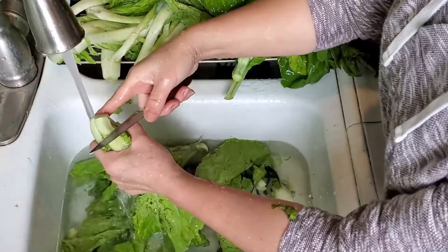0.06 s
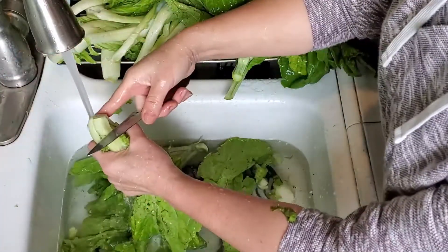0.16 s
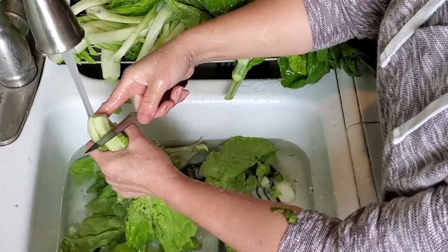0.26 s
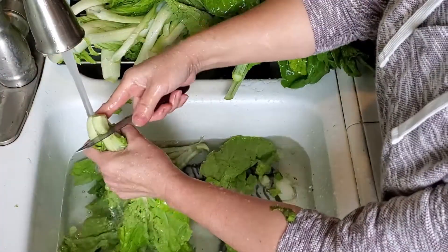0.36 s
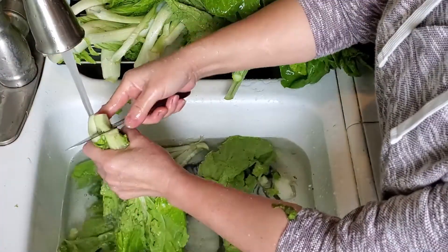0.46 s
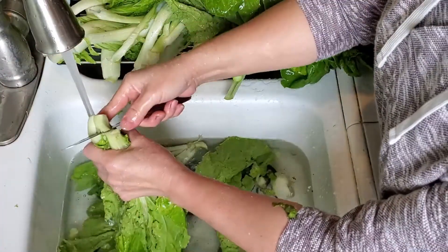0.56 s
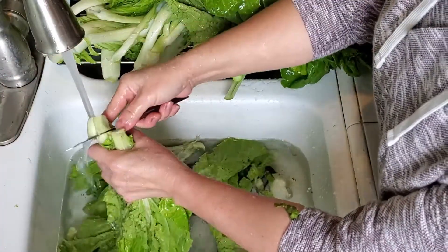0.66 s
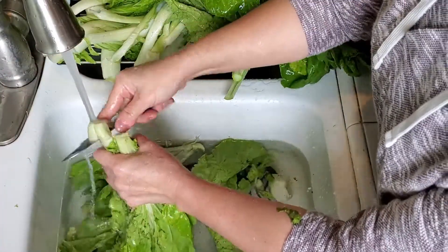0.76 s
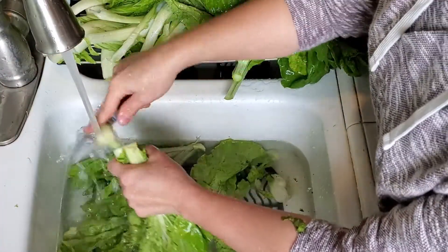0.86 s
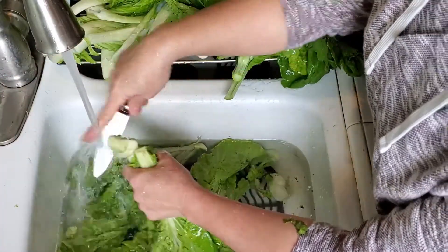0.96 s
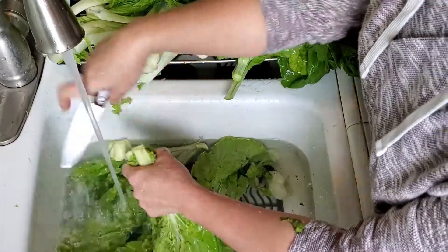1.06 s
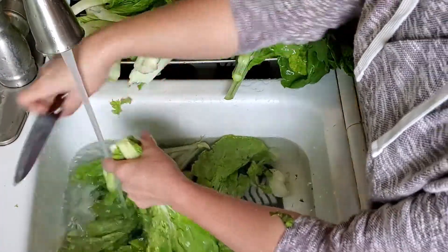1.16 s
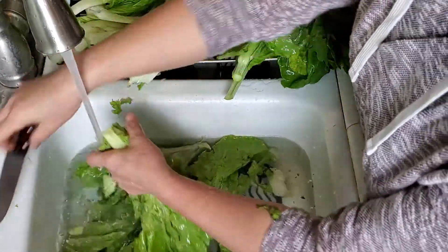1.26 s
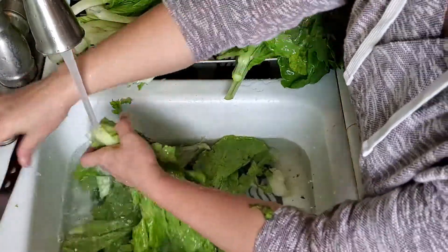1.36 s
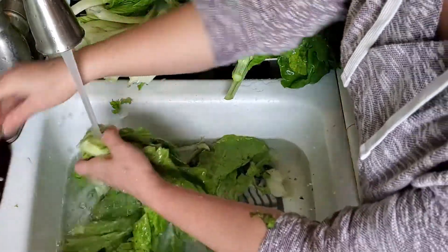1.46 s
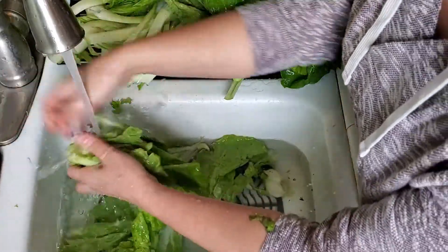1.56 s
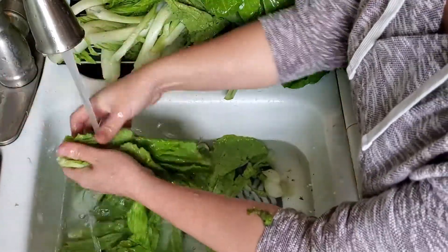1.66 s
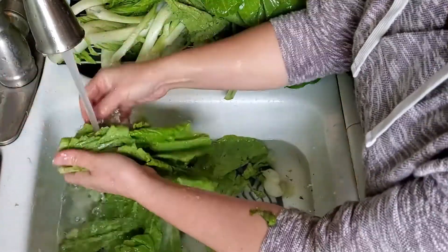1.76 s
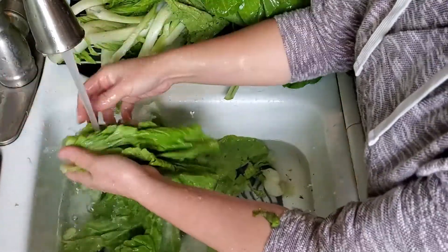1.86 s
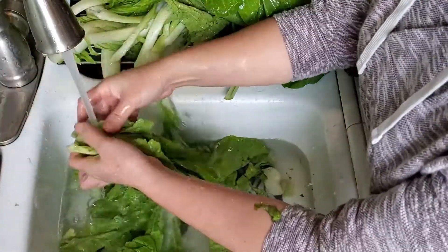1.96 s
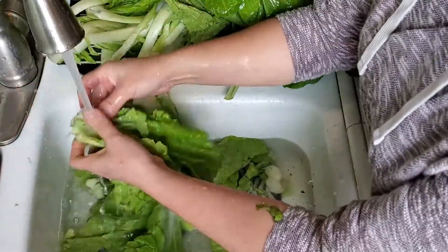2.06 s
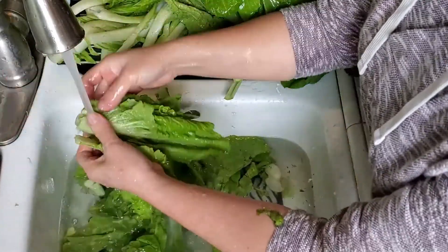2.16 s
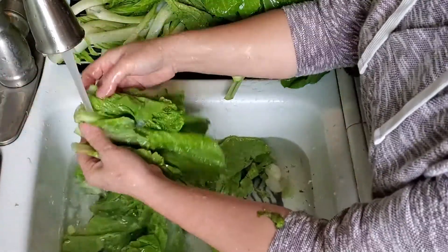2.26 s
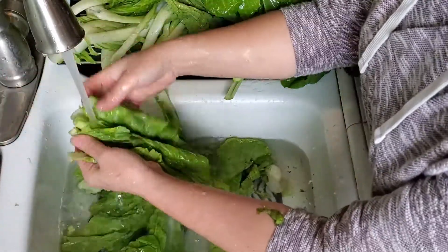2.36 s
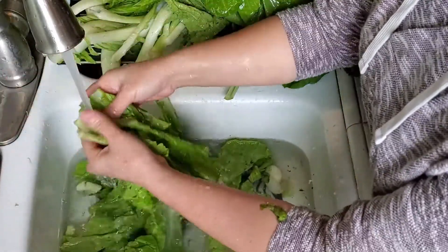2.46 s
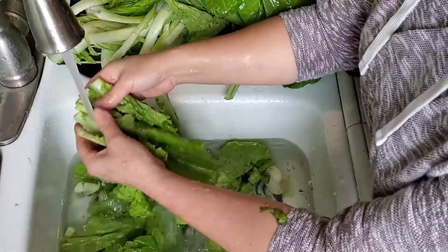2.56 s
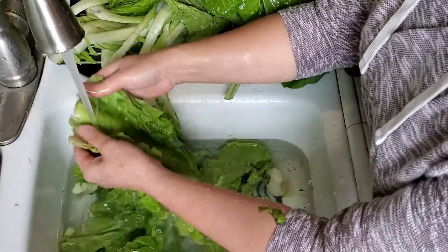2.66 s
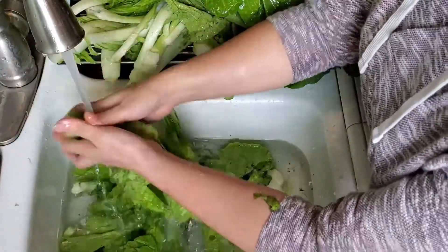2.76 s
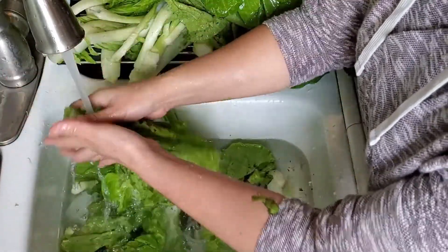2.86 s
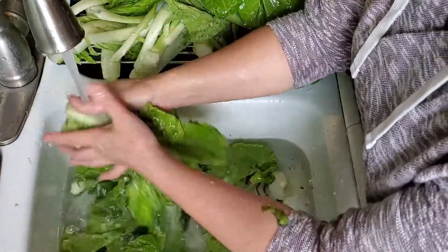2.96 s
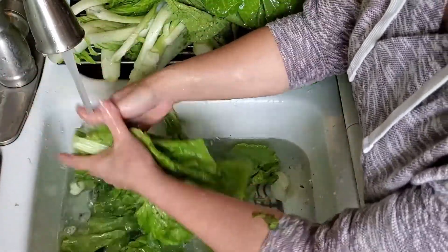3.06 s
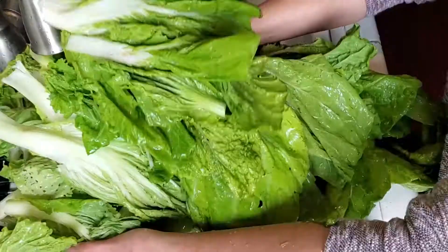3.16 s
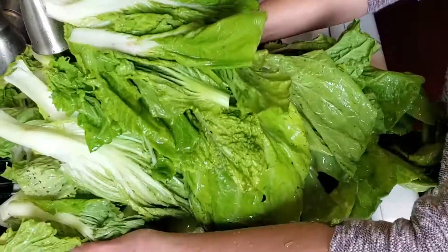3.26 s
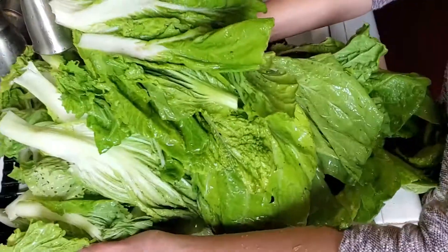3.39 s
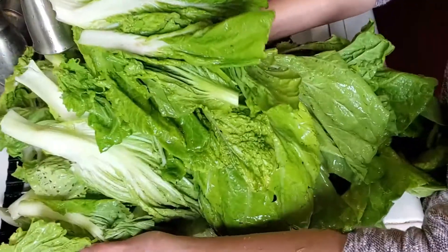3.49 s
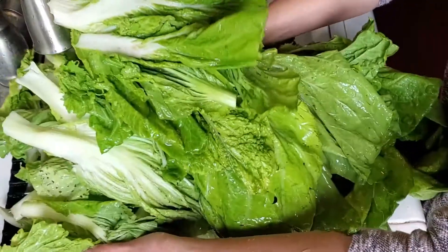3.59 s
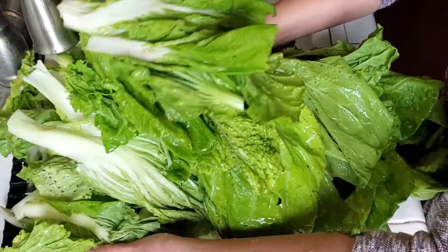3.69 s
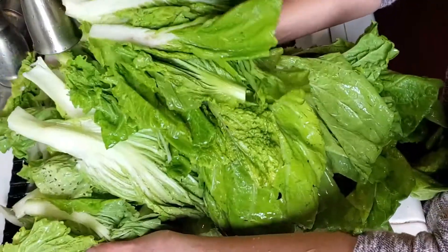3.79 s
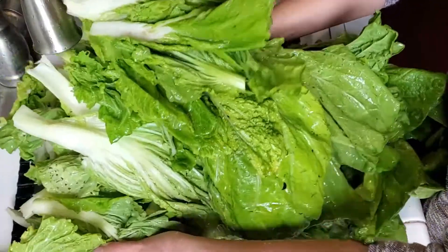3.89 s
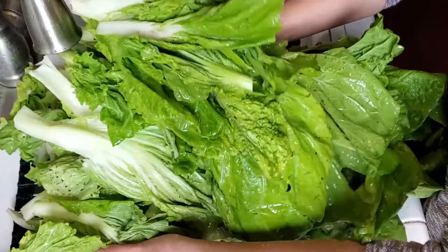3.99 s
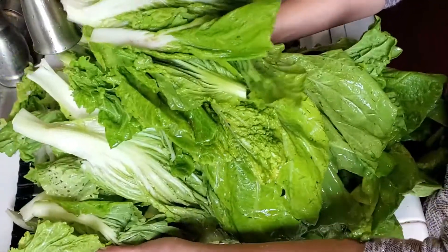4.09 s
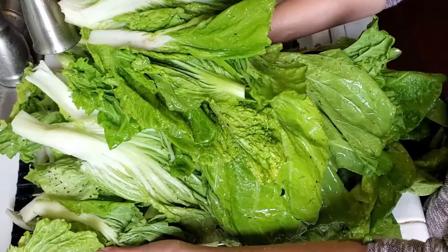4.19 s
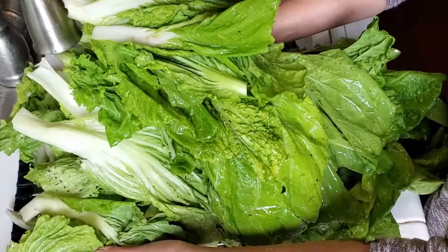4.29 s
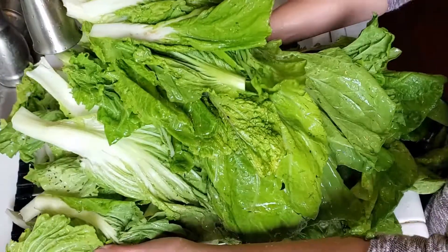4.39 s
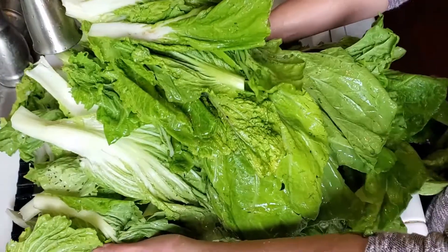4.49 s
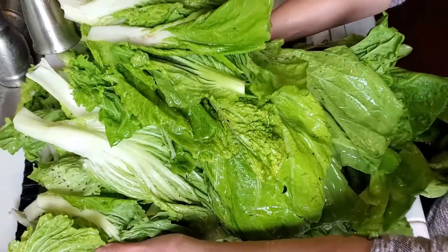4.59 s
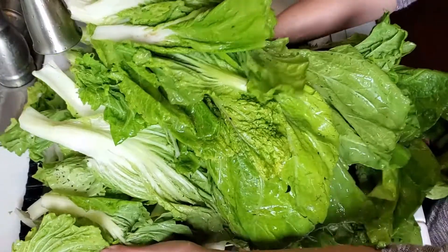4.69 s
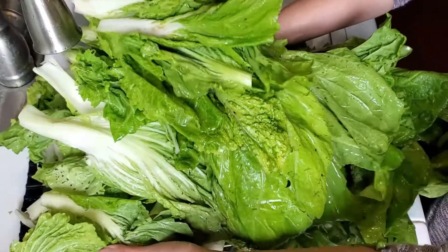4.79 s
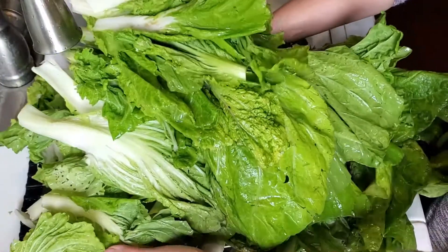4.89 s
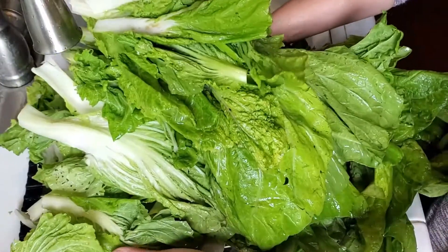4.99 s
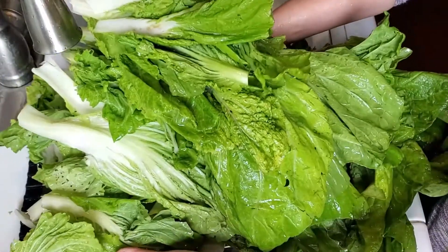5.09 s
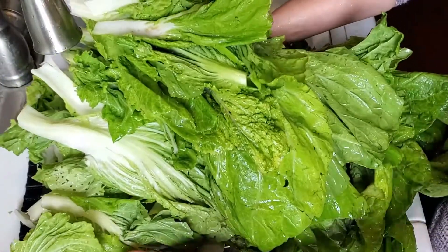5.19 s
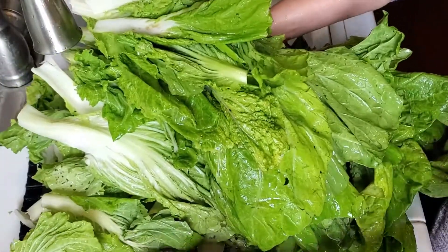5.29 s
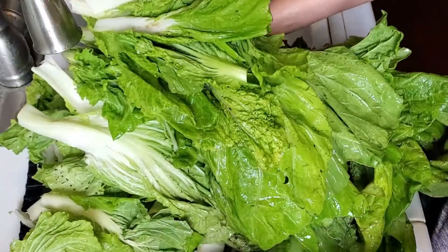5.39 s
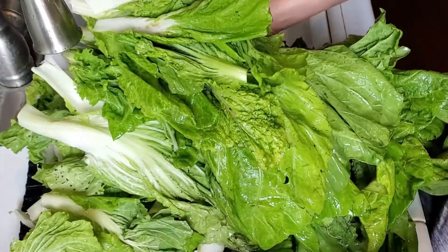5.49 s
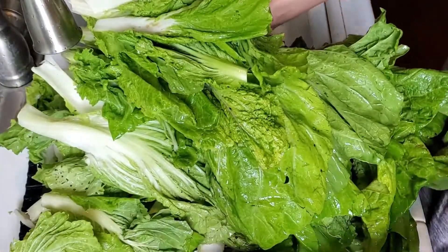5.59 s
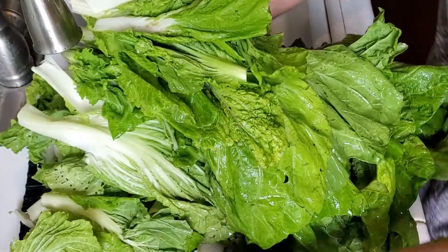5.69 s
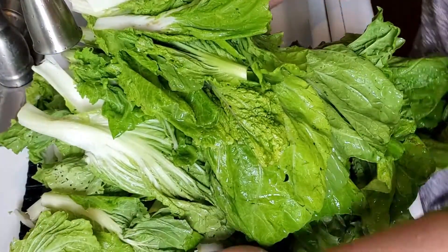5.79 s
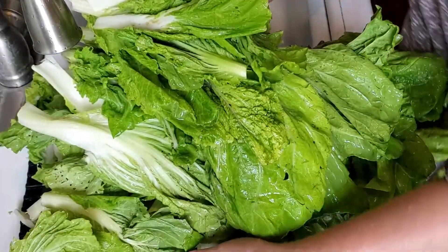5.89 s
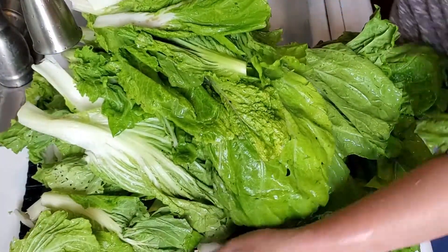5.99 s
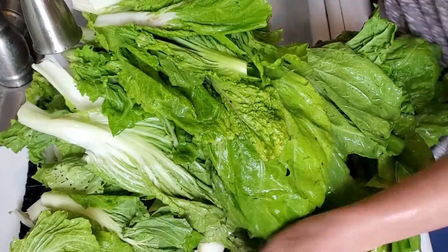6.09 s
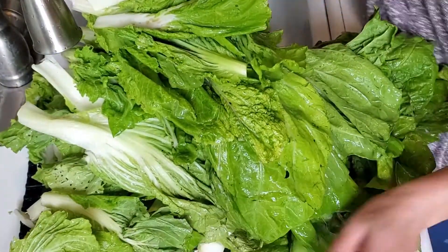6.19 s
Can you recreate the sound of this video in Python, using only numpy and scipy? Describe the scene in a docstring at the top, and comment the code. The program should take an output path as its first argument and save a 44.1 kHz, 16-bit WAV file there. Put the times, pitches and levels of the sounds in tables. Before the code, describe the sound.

A bright, pattering tap stream with low basin gurgle sits close and slightly left. Crunchy stalk cuts come first, then splashes and bubble gulps, then a hard, bright blade clatter, the loudest moment. Rinsing continues with small slaps and sloshes until a sudden edit. After it, a far softer, hollow trickle drips and babbles under wet leaves that rustle and snap lightly, over low fridge hum and dull room tone.

```python
"""Washing greens in a kitchen sink.

A tap (click noise, sine bubbles) runs over leaves; water sloshes, slaps and gulps (click swarms, tones).
A knife crunches a stalk (swarms, knocks) and clatters on the counter (damped modes). The sound cuts abruptly
to water muffled under a heap of greens: it trickles and drips in the ringing hollow, wet leaves rustle and
snap. Behind: a fridge hum (sines), room noise and a low rumble (filtered noise)."""
import sys
import numpy as np
from scipy import signal
from scipy.fft import rfft, irfft, next_fast_len
from scipy.io import wavfile
from scipy.ndimage import uniform_filter1d

SR = 44100
rng = np.random.default_rng(int(sys.argv[2]) if len(sys.argv) > 2 else 0)


def wav_record(signal):
    """Record a signal, one row per channel, as 16-bit PCM in the file named by sys.argv[1]."""
    frames = np.transpose(np.atleast_2d(signal))
    bounded = np.clip(frames, -1, 1)
    # unit amplitude maps onto the largest positive 16-bit level
    quanta = np.round(bounded * 32767).astype(np.int16)
    wavfile.write(sys.argv[1], SR, quanta)


N = 275625
T = np.arange(N) / SR
BRIEF = T[:SR // 3]  # time axis of one short event

# stream on hands and leaves: t/s, relative level/dB
STREAM_LEVEL = [(0.0, -41), (0.14, -42), (0.3, -40), (0.75, -43), (1.1, -42), (1.22, -40), (1.7, -42),
                (2.15, -44), (2.45, -46), (2.75, -44), (3.2, -40.5)]
# spray spectrum: f/Hz, density/(dB per Hz)
SPRAY_SPECTRUM = [(400, -21.5), (1000, -19), (2000, -5), (3400, 0.5), (5500, 0), (6900, -1), (7900, -6.5),
                  (9200, -2), (12000, -0.5), (15800, 0.5)]
# basin gurgle spectrum: f/Hz, density/(dB per Hz)
GURGLE_SPECTRUM = [(90, -9), (200, -1.5), (380, -10), (600, -2.5), (850, -8), (1170, 0), (1500, -4.5),
                   (2400, -6), (4500, -23.5)]
CUT_TO_HEAP_S = 3.216
STIR_SPRAY_DB, STIR_GURGLE_DB = 3.5, -1  # change when fully stirred
GURGLE_DB = -8.5  # re stream level


def tap():
    """Droplets patter on leaves in quick spurts and whip up small bubbles; the basin gurgles lower down."""
    stream_db, = curves(STREAM_LEVEL)
    stirred = stir()
    spray_db = stream_db + STIR_SPRAY_DB * stirred
    gurgle_db = stream_db + GURGLE_DB + STIR_GURGLE_DB * stirred + 0.92 * walk(8.0)
    spurts = undb(1.0 * walk(44.74) + 2.47 * walk(260))
    patter = clicks(rate=7000, spread_db=-0.5) * spurts
    spray = unit(colour(patter, SPRAY_SPECTRUM)) * undb(spray_db + 5.5)
    foam = fizz(count=1100, low_hz=1577, high_hz=6644, cycles=160, spread_db=2.5) * undb(spray_db - 9.5)
    churn = clicks(rate=1500, spread_db=3.5) * undb(2 * walk(29.53))
    gurgle = unit(colour(churn, GURGLE_SPECTRUM)) * undb(gurgle_db)
    glugs = fizz(count=450, low_hz=720, high_hz=1562, cycles=114, spread_db=6.0) * undb(gurgle_db - 9.5)
    drops = splats(count=110, low_hz=1450, high_hz=6460, spread_db=5.0) * undb(spray_db - 13.5)
    return spray + foam + drops + gurgle + glugs


def before_cut():
    """1 before the abrupt cut to the heap, 0 after it."""
    return np.clip((CUT_TO_HEAP_S - T) / 0.017 + .5, 0, 1)


def splats(count, low_hz, high_hz, spread_db):
    """Bigger drops break off the stream at random; each spatters in its own register."""
    out = np.zeros((2, N))
    for when, pitch, strength in rng.random((count, 3)):
        hz = low_hz * (high_hz / low_hz) ** pitch
        spatter = crackle(0.00057, 0.0086, rate=4000, spread_db=2.0)
        add(out, when * CUT_TO_HEAP_S, band(spatter, hz, 0.24), spread_db * strength)
    return unit(out)


# water sloshing off turned leaves: t/s, relative level/dB, length/s, centre f/Hz
SLOSH_EVENTS = [(0.822, -29, 0.027, 1150), (1.151, -35, 0.01, 664), (1.171, -35, 0.027, 1450),
                (1.264, -41, 0.014, 520), (2.019, -37, 0.059, 1300), (2.169, -36.5, 0.056, 1620),
                (2.219, -34, 0.038, 1430), (2.527, -38, 0.023, 1930), (2.661, -36.5, 0.014, 1660),
                (2.879, -36.5, 0.1, 1330), (3.169, -26, 0.0096, 1400), (4.166, -38, 0.022, 1170),
                (4.464, -42, 0.022, 2290), (5.495, -42, .06, 1340), (5.812, -40, 0.034, 1150),
                (5.972, -41, 0.019, 1560), (6.106, -46, 0.018, 1400)]
SLOSH_WIDTH, SLOSH_RISE_SHARE = 0.67, 0.39  # bandwidth/centre; build-up/length
STIR_RISE_S, STIR_FALL_S = 0.029, 0.04


def sloshes():
    """Water gathered in a leaf slides off as a soft swarm of clicks."""
    out = np.zeros((2, N))
    for s, db, length_s, hz in SLOSH_EVENTS:
        rise_s = length_s * SLOSH_RISE_SHARE
        swarm = crackle(rise_s, length_s - rise_s, rate=6500, spread_db=0.0)
        add(out, s, band(swarm, hz, SLOSH_WIDTH), db - 3.5)
    return out


def stir():
    """How stirred the water is, 0-1: rises with each slosh and settles; a short slosh stirs it less."""
    stirred = np.zeros(N)
    for s, _, length_s, _ in SLOSH_EVENTS:
        rise = np.clip((T - s) / STIR_RISE_S, 0, 1)
        fall = np.exp(-np.maximum(T - s - STIR_RISE_S, 0) / STIR_FALL_S)
        stirred = np.maximum(stirred, rise * fall * min(length_s / STIR_RISE_S, 1))
    return stirred


# drops slapping on a taut leaf: t/s, relative level/dB, centre f/Hz, decay/s
SLAP_EVENTS = [(0.8597, -22.5, 2250, 0.0028), (.861, -30.5, 3800, .004), (1.008, -30.5, 3650, .006),
               (1.029, -38, 4040, .009), (1.064, -26.5, 5540, .004), (1.174, -30, 3280, 0.0077),
               (1.228, -33, 3600, .01), (1.331, -37, 3230, 0.01), (1.797, -42, 6000, .007),
               (2.061, -34, 5000, 0.0063), (2.1647, -40, 3700, .007), (2.581, -38.5, 3520, 0.0085),
               (2.851, -34.5, 3400, 0.011), (2.869, -29, 5900, 0.0059), (3.1385, -42, 6640, .007),
               (3.181, -32, 5770, 0.0056)]
SLAP_RISE_S, SLAP_WIDTH = 0.0011, 0.35  # build-up; bandwidth/centre


def slaps():
    """Water lands all at once: a short click swarm in a band, plus a little broad treble."""
    out = np.zeros((2, N))
    for s, db, hz, decay_s in SLAP_EVENTS:
        smack = crackle(SLAP_RISE_S, decay_s, rate=6000, spread_db=1.5)
        add(out, s, band(smack, hz, SLAP_WIDTH) + 0.12 * resonate(smack, 5300, 5000), db + 1.0)
    return out


# air bubbles in the sink water: t/s, relative level/dB, nominal f/Hz, T60/s, glide/(share of f)
BUBBLE_EVENTS = [(.018, -35, 800, 0.21, 0.0098), (.873, -41, 2360, .12, -0.0066),
                 (1.079, -35.5, 1150, .12, 0.034), (1.16, -30, 1020, 0.15, 0.2),
                 (1.26, -37.5, 600, 0.064, 0.068), (1.279, -33, 636, 0.073, 0.0088),
                 (1.462, -44.5, 594, 0.38, 0.038), (1.56, -32.5, 740, 0.045, 0.25),
                 (1.773, -42, 1166, 0.13, -0.04), (2.036, -35.5, 1237, 0.087, 0.11),
                 (2.869, -30.5, 649, 0.11, 0.24), (3.95, -45.5, 798, 0.14, 0.24)]
SHUDDER_DB, SHUDDER_RATE_HZ = 3, 167  # spread; random knots per second


def bubbles():
    """Large bubbles gulp up, each born in a small splash; they shudder as they pull free."""
    out = np.zeros((2, N))
    for s, db, hz, t60, glide in BUBBLE_EVENTS:
        tone = bubble(hz, t60, glide=glide, onset_s=0.0021, wobble=0.019)
        shudder = undb(SHUDDER_DB * walk(SHUDDER_RATE_HZ)[:tone.shape[1]])
        splash = crackle(0.0028, 0.0077, rate=4600, spread_db=-2.5)
        add(out, s, tone * shudder, db - 4.5)
        add(out, s, band(splash, hz, 0.47), db - 6.5)
    return out


# stalk giving way under the blade: t/s, relative level/dB, build-up/s, decay/s, tilt/(dB per octave),
# knock f/Hz, knock level/dB
CUT_EVENTS = [(0.258, -30, 0.0053, 0.01, 2.5, 1720, -37.5), (0.311, -29, 0.0087, 0.0067, 1, 760, -37),
              (.347, -23, .001, 0.0038, -0.5, 540, -31.5), (.353, -22.5, 0.00084, .003, -1, 1570, -32.5),
              (.467, -14, 0.0019, 0.0034, -0.5, 620, -35.5), (.471, -14, 0.0014, 0.0013, -1.5, 1300, -21),
              (.487, -25, 0.0017, 0.003, 4, 930, -33), (0.5351, -22, 0.00049, 0.0048, -0.5, 1350, -34),
              (.547, -26, 0.002, 0.0026, 1, 980, -34), (0.6286, -23.5, 0.0011, 0.0082, -0.5, 960, -40),
              (.648, -24, 0.0013, 0.0049, -1, 1590, -34), (.658, -25, 0.0027, 0.0097, 0, 950, -44)]
# stalk colour: f/Hz, gain/dB
STALK_COLOUR = [(80, -20), (180, -13), (330, -13), (580, -9), (760, -13), (940, 6.5), (1120, -8),
                (1310, -4), (1700, 2), (2000, -4), (2500, -12), (3300, -2), (4200, -6.5), (6500, -2),
                (7900, -9), (15500, -7)]
KNOCK_WIDTH_HZ, CELLS_PER_S = 160, 3400


def cuts():
    """Crisp cells burst in swarms as the blade goes through; each swarm knocks the hand-held stalk."""
    out = np.zeros((2, N))
    for s, db, rise_s, decay_s, tilt_db, hz, knock_db in CUT_EVENTS:
        burst = crackle(rise_s, decay_s, rate=CELLS_PER_S, spread_db=3.5)
        add(out, s, colour(burst, STALK_COLOUR, tilt_db), db - 0.5)
        add(out, s, resonate(resonate(burst, hz, KNOCK_WIDTH_HZ), hz, 500), knock_db)
    return out


# knife meeting the counter: t/s, relative level/dB, chatter/s, decay/s, tilt/(dB per octave)
CLATTER_EVENTS = [(1.411, -3, 0.004, .001, 3.5), (1.453, -2.5, 0.0008, 0.0035, 2),
                  (1.460, -19.5, 0.006, 0.075, -3.5), (1.483, -19.5, 0.00075, 0.0023, -5),
                  (1.492, -20, .001, 0.0075, -4), (1.535, -21, 0.0015, 0.009, -6),
                  (1.572, -24, 0.011, 0.014, -5.5), (1.62, -10.5, 0.00071, 0.003, -3),
                  (1.634, -35, 0.00087, 0.0028, -7.5)]
# contact colour: f/Hz, gain/dB
SCRAPE_COLOUR = [(60, -46.5), (300, -31), (1400, -13), (2700, -8), (3700, 1.5), (5000, 2), (8000, 1.5),
                 (10500, 0.5), (15500, 2)]
# steel blade modes: nominal f/Hz, width/Hz, relative gain/dB
BLADE_MODES = [(3750, 230, -15), (4600, 220, -13), (6500, 250, -3), (8770, 130, -1.5), (8840, 180, 2.5),
               (9630, 260, 2), (11360, 270, -7), (12800, 490, -3.5), (15700, 500, -9)]
BLADE_DETUNE = 0.013  # spread of each mode per contact, share of f


def knife():
    """The blade chatters on the counter, slides and settles; every contact rings its damped modes."""
    out = np.zeros((2, N))
    for s, db, chatter_s, decay_s, tilt_db in CLATTER_EVENTS:
        envelope = np.exp(-np.maximum(BRIEF - chatter_s, 0) / decay_s)
        contact = clicks(rate=29000, spread_db=3.0, size=len(BRIEF)) * envelope
        # a longer slide catches and slips
        catch_db = 3.1 * walk(241)[:len(BRIEF)] * np.minimum(BRIEF / 0.019, 1)
        contact = contact * undb(catch_db)
        modes = [(hz * (1 + BLADE_DETUNE * rng.standard_normal()), width_hz, mode_db)
                 for hz, width_hz, mode_db in BLADE_MODES]
        add(out, s, colour(contact + undb(4.5) * ring(contact, modes), SCRAPE_COLOUR, tilt_db), db - 1.5)
    return out


# flow under the heap: t/s, relative level/dB
FLOW_LEVEL = [(3.3, -1), (3.55, 0.5), (3.85, 1.5), (4.35, -2), (4.55, -1), (4.8, 1), (5.3, -0.5), (6.2, 0)]
# leaf rustle spectrum: f/Hz, density/(dB per Hz)
RUSTLE_SPECTRUM = [(300, -10), (1000, -7.5), (2400, -2.5), (3700, -1), (4900, -8), (6000, -2.5),
                   (6900, -5.5), (7800, -16), (9500, -9), (13000, -7.5), (15800, -8)]
# air under the heap, resonances: f/Hz, width/Hz, relative gain/dB
HOLLOW_MODES = [(784, 90, -11), (1170, 28, -2), (1218, 12, -4), (1330, 18, -9), (1460, 11, 0.5),
                (1602, 15, -5), (1724, 19, 3.5), (1788, 20, 0.5), (1830, 22, -6), (1986, 20, -3.5),
                (2328, 45, -7.5), (2530, 14, -9), (2957, 65, -8.5), (3150, 49, -1), (3368, 50, -8),
                (3440, 43, -7), (3910, 180, -11)]
TRICKLE_DB, RUSTLE_DB, BABBLE_DB = -52, -53.5, -59  # relative levels before flow and stir
STIR_TRICKLE_DB, STIR_RUSTLE_DB = 7.5, 2  # lift when fully stirred
HOLLOW_WAVER_S = 0.0001


def heap():
    """Water trickles in spurts into the ringing hollow; tiny bubbles babble, wet leaves rustle on top."""
    stirred = stir()
    flow_db, = curves(FLOW_LEVEL)
    trickle_db = TRICKLE_DB + flow_db + STIR_TRICKLE_DB * stirred
    rustle_db = RUSTLE_DB + flow_db + STIR_RUSTLE_DB * stirred
    spurts = undb(3.5 * np.tanh(walk(22)))
    flutter = undb(4.5 * np.tanh(walk(40)))
    dribble = clicks(rate=600, spread_db=1.5) * spurts
    # the hollow changes shape: its ringing runs a little early or late
    wavering = T + HOLLOW_WAVER_S * walk(14)
    ringing = np.array([np.interp(wavering, T, ear) for ear in ring(dribble, HOLLOW_MODES)])
    trickle = unit(ringing) * undb(trickle_db - 0.5)
    rustle = unit(colour(clicks(rate=2500, spread_db=2.0) * flutter, RUSTLE_SPECTRUM)) * undb(rustle_db)
    babble = fizz(count=480, low_hz=1003, high_hz=3975, cycles=95, spread_db=1.0) * undb(BABBLE_DB + flow_db)
    foam = fizz(count=400, low_hz=3500, high_hz=6740, cycles=200, spread_db=1.5) * undb(rustle_db - 10.5)
    return (trickle + rustle + babble + foam) * (1 - before_cut())


LOW_HZ, MID_HZ, HIGH_HZ = 1165, 1480, 1744  # three air pockets in the hollow
# drips into the hollow: t/s, relative level/dB, pocket f/Hz
DRIP_EVENTS = [(3.268, -44, HIGH_HZ), (3.318, -47, MID_HZ), (3.356, -54, HIGH_HZ), (3.442, -47, HIGH_HZ),
               (3.594, -47, LOW_HZ), (3.708, -41, LOW_HZ), (3.76, -43, LOW_HZ), (4.0686, -46, HIGH_HZ),
               (4.1, -41, HIGH_HZ), (4.128, -38.5, HIGH_HZ), (4.237, -42.5, LOW_HZ), (4.399, -45.5, LOW_HZ),
               (4.505, -46.5, LOW_HZ), (4.565, -44, LOW_HZ), (4.8665, -47.5, HIGH_HZ),
               (5.166, -50.5, HIGH_HZ), (5.481, -38.5, LOW_HZ), (5.512, -44, LOW_HZ), (5.54, -44.5, MID_HZ),
               (5.597, -46, HIGH_HZ), (5.9917, -43.5, HIGH_HZ), (6.007, -40, MID_HZ),
               (6.0864, -41.5, HIGH_HZ), (6.105, -38, MID_HZ), (6.122, -46, HIGH_HZ), (6.135, -44, MID_HZ),
               (6.156, -47, LOW_HZ)]
DRIP_RISE_S, DRIP_DECAY_S, POCKET_WIDTH_HZ = 0.01, .009, 42


def drips():
    """A drip traps a small bubble, gurgles in its pocket and wakes the resonances near it."""
    out = np.zeros((2, N))
    for s, db, hz in DRIP_EVENTS:
        spatter = crackle(DRIP_RISE_S, DRIP_DECAY_S, rate=5000, spread_db=1.0)
        plop = resonate(spatter, hz, 470)
        add(out, s, bubble(hz, t60=0.089, glide=0.032, onset_s=0.0063, wobble=0.012), db - 3.5)
        add(out, s, resonate(plop, hz, POCKET_WIDTH_HZ), db - 6.5)
        add(out, s, ring(plop, HOLLOW_MODES), db - 6)
    return out


# wet leaves snapping apart: t/s, relative level/dB, centre f/Hz
SNAP_EVENTS = [(3.255, -46, 4660), (3.385, -46.5, 3450), (3.828, -45.5, 3700), (3.887, -49, 5800),
               (4.584, -47, 6000), (4.972, -48.5, 5570), (5.055, -46.5, 5100), (5.215, -46.5, 4450),
               (5.235, -50.5, 10000), (5.399, -47, 6300), (5.547, -44, 11200), (5.759, -47, 3330),
               (6.073, -49, 4370)]


def snaps():
    """Wet leaves snap apart: a short click swarm in a narrow band."""
    out = np.zeros((2, N))
    for s, db, hz in SNAP_EVENTS:
        add(out, s, band(crackle(0.0026, 0.017, rate=3000, spread_db=2), hz, 0.31), db + 2.5)
    return out


# fridge partials: f/Hz, mean level/dB
HUM_PARTIALS = [(59.4, -56.5), (119, -62), (147, -62.5), (258, -70.5), (423.5, -63.5), (716, -71.5)]
# kitchen background spectrum: f/Hz, density/(dB per Hz)
AIR_SPECTRUM = [(22, -25.5), (31, -22), (38, -0.5), (44, -1.5), (60, 1), (80, -5.5), (110, -9),
                (190, -11.5), (290, -6), (390, -9.5), (500, -16.5), (900, -16), (2000, -22), (8000, -33)]
AIR_DB = -51.5


def fridge():
    """Sine partials wavering in level and phase, over the low noise of the room."""
    hum = np.zeros(N)
    for hz, db in HUM_PARTIALS:
        amplitude = undb(db + 2.3 * walk(4.8)) * np.sqrt(2)
        hum += amplitude * np.sin(2 * np.pi * hz * T + .5 * walk(2.95))
    return hum + unit(colour(diffuse(N, wide_hz=450), AIR_SPECTRUM)) * undb(AIR_DB)


# swells of a deep rumble: t/s, level/dB
RUMBLE_SWELLS = [(2.45, -51), (2.96, -49)]
RUMBLE_HZ, RUMBLE_S = 43, 0.18


def rumble():
    """Narrow low noise swells and fades, alike in both ears."""
    swell = sum(undb(db) * np.exp(-((T - s) / RUMBLE_S) ** 2) for s, db in RUMBLE_SWELLS)
    noise = rng.standard_normal(N)
    return swell * unit(resonate(resonate(noise, RUMBLE_HZ, 10), RUMBLE_HZ, 11))


def bubble(hz, t60, glide=.05, onset_s=.0015, wobble=0.009):
    """Trapped air rings like a sine, wavers with its shape and glides; the ears get different phases."""
    t = BRIEF[:int(t60 * SR) + 200]
    shape = np.interp(t / t[-1] * 15, np.arange(16), rng.standard_normal(16))
    pitch = hz * (1 + glide * (np.minimum(2 * t / t60, 1) - .25) + wobble * shape)
    phase = 2 * np.pi * np.cumsum(pitch) / SR
    envelope = (1 - np.exp(-t / onset_s)) * np.exp(-np.log(1000) * t / t60)
    return envelope * np.sin([phase + rng.uniform(-0.054, 1) * hz / 1400, phase])


def fizz(count, low_hz, high_hz, cycles, spread_db):
    """Many small bubbles at random moments, each ringing for about the same number of cycles."""
    out = np.zeros((2, N))
    for when, pitch, strength in rng.random((count, 3)):
        hz = low_hz * (high_hz / low_hz) ** pitch
        tone = bubble(hz, cycles / hz, glide=0.058, onset_s=0.0013)
        add(out, when * T[-1], tone, -spread_db * np.log(strength + 0.054))
    return unit(out)


def clicks(rate, spread_db, size=N):
    """Tiny impacts of uneven size, each from its own direction, reaching the two ears apart."""
    at = np.flatnonzero(rng.random(size) < rate / SR)
    chance = rng.random((len(at), 3))
    strength = undb(-spread_db * np.log(.01 + chance[:, 0])) * np.sign(chance[:, 1] - .5)
    lag = np.round(44 * (chance[:, 2] - .5)).astype(int)  # samples, up to 0.5 ms either way
    out = np.zeros((2, size))
    out[0, at] = strength
    np.add.at(out[1], (at + lag) % size, strength)
    return unit(out)


def crackle(rise_s, decay_s, rate, spread_db):
    """A swarm of clicks that builds up and dies away."""
    envelope = np.minimum(BRIEF / rise_s, 1) * np.exp(-np.maximum(BRIEF - rise_s, 0) / decay_s)
    return envelope * clicks(rate, spread_db, size=len(BRIEF))


def diffuse(size, wide_hz):
    """Noise from all around: long waves are alike in both ears, short ones unrelated."""
    mid, side = rng.standard_normal((2, size))
    apart = 1 - 1 / (1 + (np.fft.rfftfreq(size, 1 / SR) / wide_hz) ** 2)
    mid = irfft(rfft(mid) * np.sqrt(2 - apart), size)
    side = irfft(rfft(side) * np.sqrt(apart), size)
    return unit(np.array([mid + side, mid - side]))


def walk(rate):
    """Random wandering in straight lines between normal draws, rate knots per second."""
    knots = rng.standard_normal(int(N / SR * rate) + 2)
    return np.interp(T * rate, np.arange(len(knots)), knots)


def colour(x, points, tilt_db=0):
    """Causal minimum-phase filter through (Hz, dB) points, tilted by dB per octave."""
    n = 2 * next_fast_len(x.shape[-1] // 2 + 1, True)
    octave = np.log2(np.fft.rfftfreq(n, 1 / SR) + 1)
    hz, db = np.transpose(points)
    gain_db = np.interp(octave, np.log2(hz), db) + tilt_db * octave
    cepstrum = irfft(np.log(undb(gain_db)))
    # fold the cepstrum to positive times
    cepstrum[1:n // 2] *= 2
    cepstrum[n // 2 + 1:] = 0
    return irfft(rfft(x, n) * np.exp(rfft(cepstrum)))[..., :x.shape[-1]]


def resonate(x, hz, width_hz):
    """One resonance, gain 1 at its centre."""
    b, a = signal.iirpeak(min(hz, SR / 2 - 1), hz / width_hz, fs=SR)
    return signal.lfilter(b, a, x + 1e-18)


def band(x, hz, share):
    """Two equal resonances in series: steep skirts, each as wide as a share of the centre."""
    return resonate(resonate(x, hz, hz * share), hz, hz * share)


def ring(x, modes):
    """A body of several (Hz, width Hz, dB) resonances in parallel."""
    return sum(undb(db) * resonate(x, hz, width_hz) for hz, width_hz, db in modes)


def undb(db):
    """Decibels to gain."""
    return 10 ** (np.asarray(db) / 20)


def curves(rows):
    """Each column of a table as a line through time."""
    s, *columns = np.transpose(rows)
    return [np.interp(T, s, c) for c in columns]


def unit(x):
    """Scale to rms 1."""
    return x / np.sqrt(np.mean(x ** 2))


def add(out, s, x, db):
    """Mix in an event whose loudest 3 ms stand at db."""
    peak = np.sqrt(uniform_filter1d(np.mean(x ** 2, axis=0), size=130).max())
    i = max(int(s * SR), 0)
    out[:, i:i + x.shape[1]] += x[:, :N - i] * undb(db) / peak


def kitchen(x, wet_db, t60):
    """Close hard walls add a short, slightly dull tail of decaying noise."""
    tail = diffuse(len(BRIEF), wide_hz=550) * undb(-60 * BRIEF / t60) * np.minimum(BRIEF / .004, 1)
    tail = colour(tail, [(100, 4.0), (5000, 3.5), (15000, -3.5)])
    tail /= np.sqrt(np.sum(tail ** 2) / 2)
    wet = signal.fftconvolve(x, tail, axes=1)[:, :N]
    return (x + undb(wet_db) * wet) / np.hypot(1, undb(wet_db))


def scene():
    """The sink lies a little to the left; the hum and rumble are added without tail."""
    water = kitchen(tap(), wet_db=-6.0, t60=0.2) * before_cut()
    water = water + kitchen(sloshes() + slaps() + bubbles(), wet_db=-7.0, t60=0.24)
    blade = kitchen(cuts(), wet_db=-6.5, t60=0.2) + kitchen(knife(), wet_db=-6.5, t60=0.13)
    greens = kitchen(heap() + drips() + snaps(), wet_db=-5.5, t60=0.12)
    left_db = 1.57  # left over right
    balance = undb(np.array([[left_db], [-left_db]]) / 2)
    return (water + blade + greens) * balance + fridge() + rumble()


TOP_HZ = 15900


def record(dry, threshold_db=-13, share=0.43, release_db=1.5):
    """Gain ducks at once under a loud hit, recovers release_db a second; peaks rounded, top cut."""
    power = np.abs(uniform_filter1d(np.mean(dry ** 2, axis=0), size=130))
    level_db = 10 * np.log10(power + 1e-12)
    excess_db = share * np.maximum(level_db - threshold_db, 0)
    duck_db = np.maximum.accumulate(excess_db + release_db * T) - release_db * T
    rounded = .9 * np.tanh(dry * undb(-duck_db) / .9)
    return signal.sosfilt(signal.ellip(10, .2, 80, TOP_HZ, fs=SR, output="sos"), rounded)


dry = scene()
out = record(dry)
wav_record(out)
```